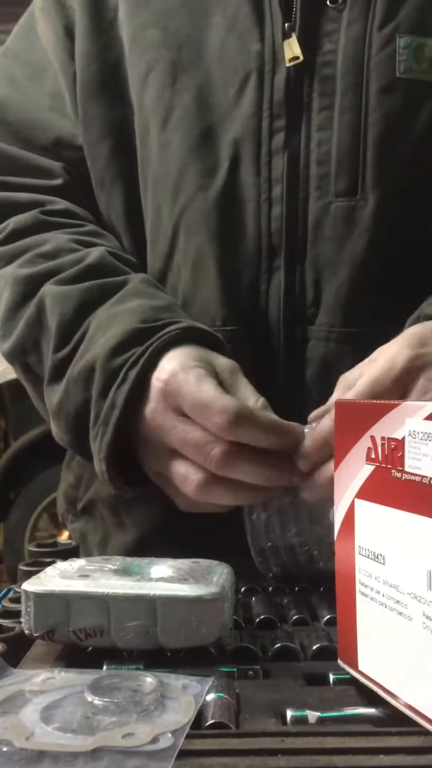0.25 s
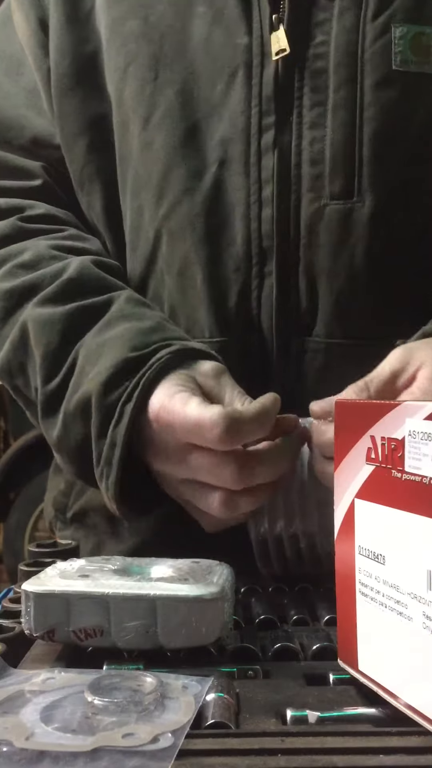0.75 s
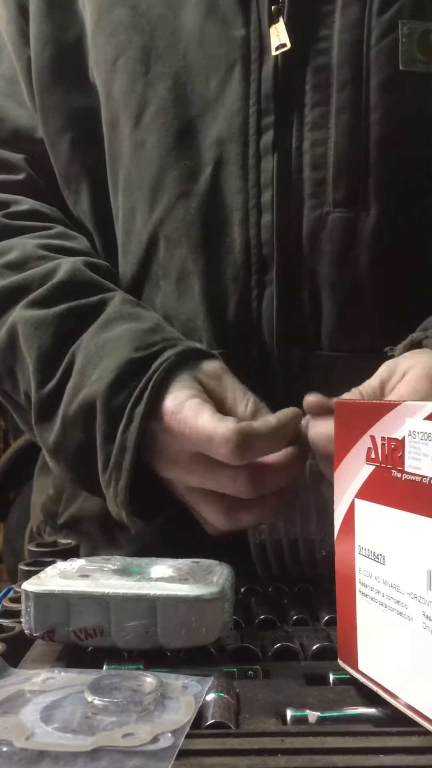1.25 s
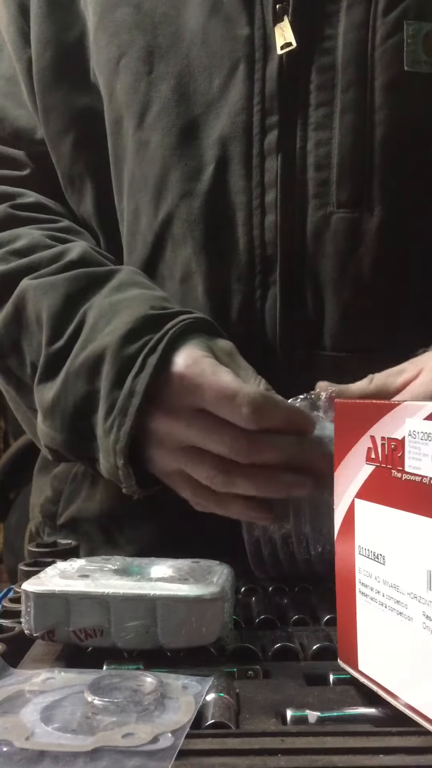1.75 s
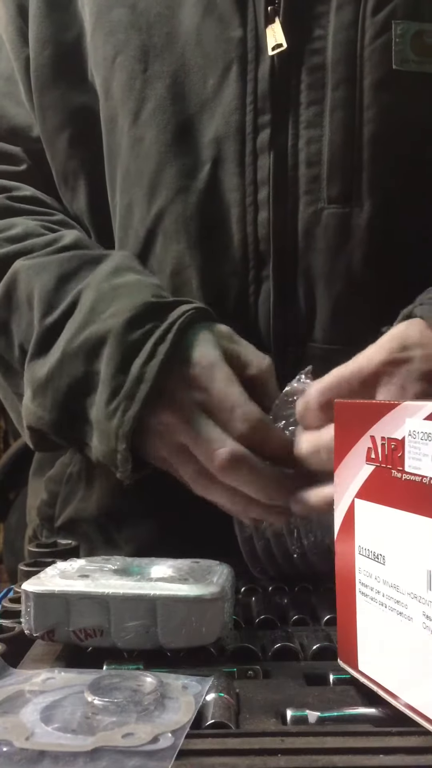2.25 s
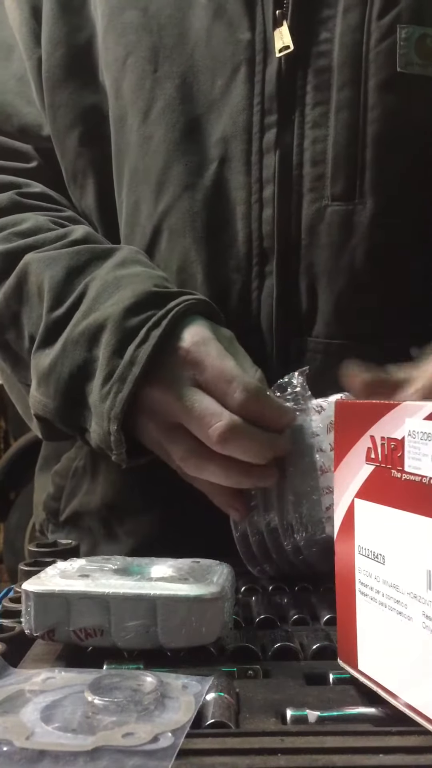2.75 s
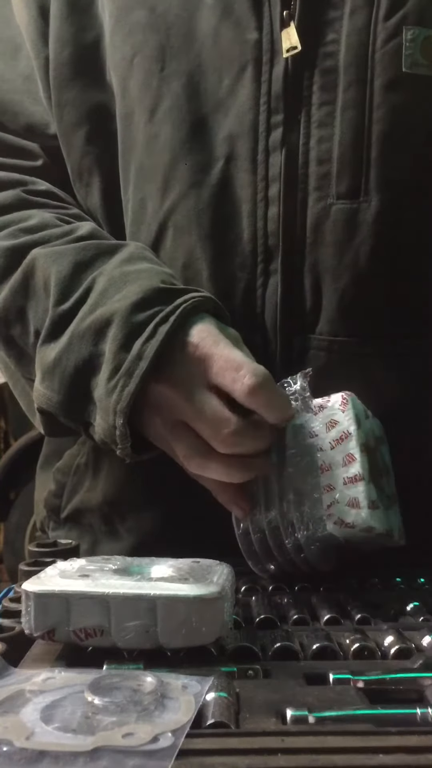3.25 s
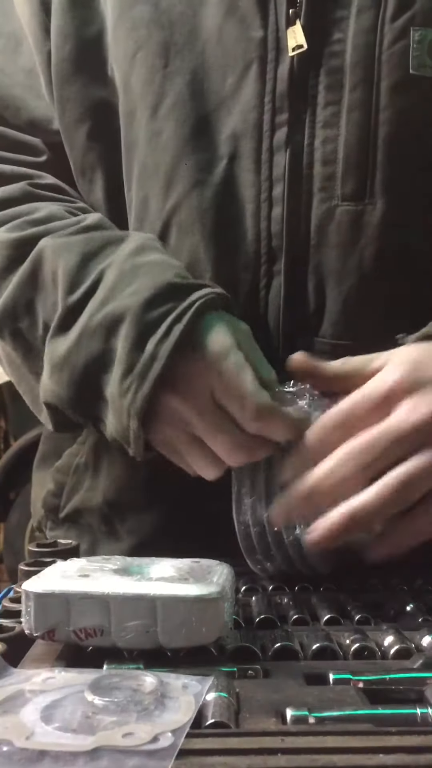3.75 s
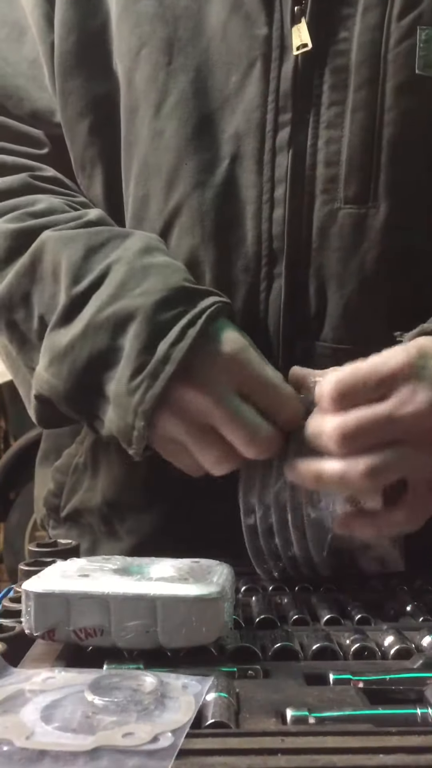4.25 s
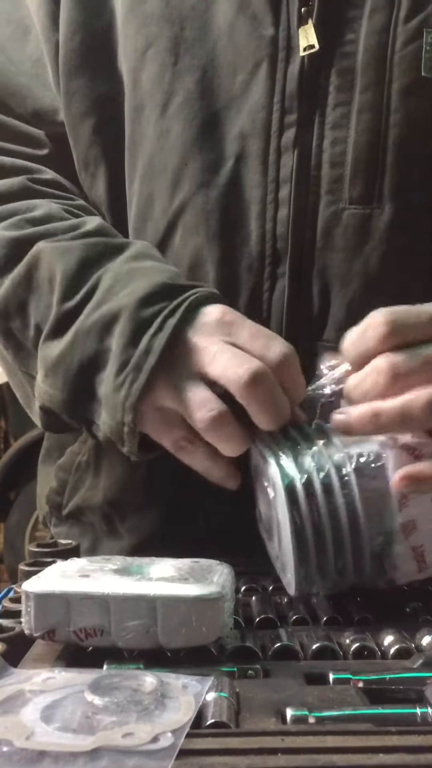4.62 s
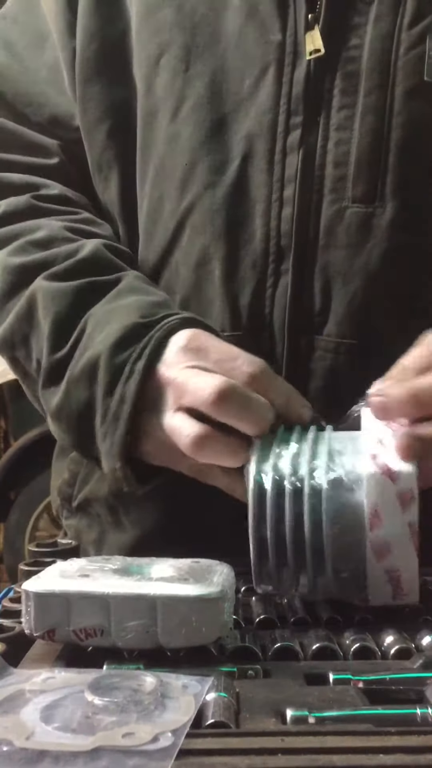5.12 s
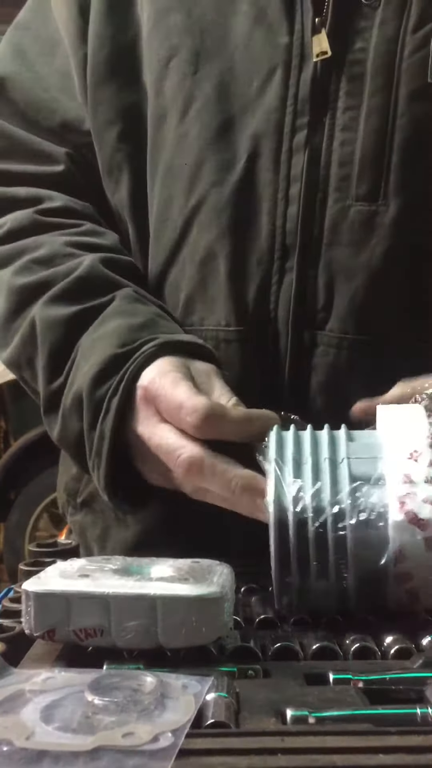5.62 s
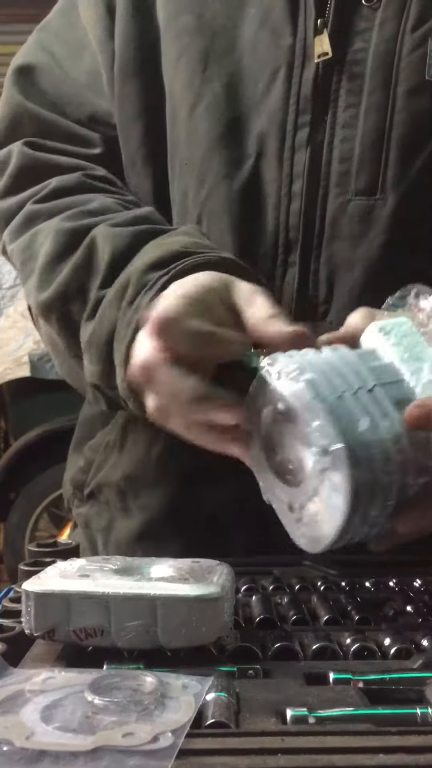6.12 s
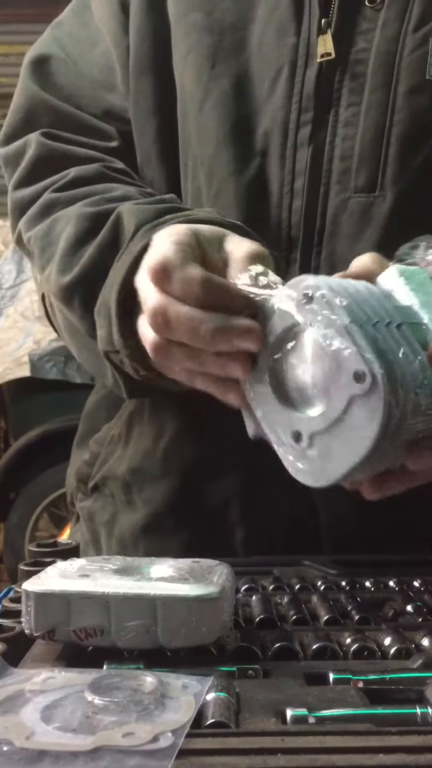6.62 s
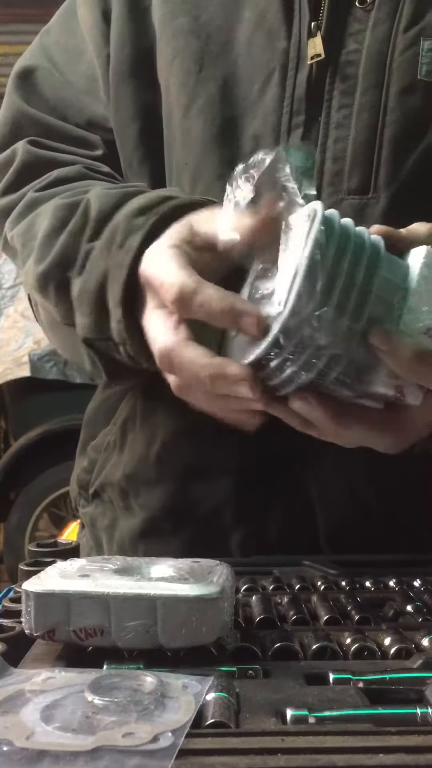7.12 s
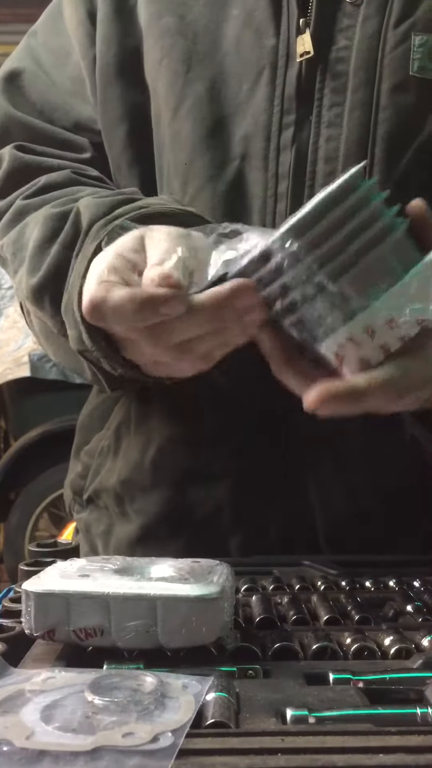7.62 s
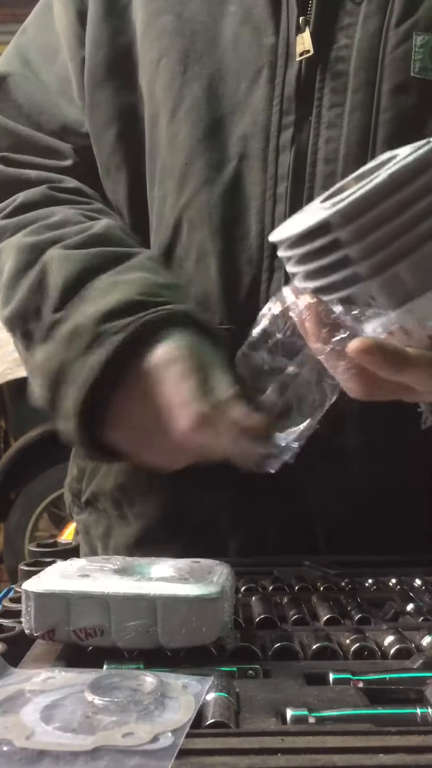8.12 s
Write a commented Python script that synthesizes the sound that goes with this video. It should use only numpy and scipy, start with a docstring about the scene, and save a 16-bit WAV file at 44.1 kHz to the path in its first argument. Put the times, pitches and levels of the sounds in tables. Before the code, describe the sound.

Thin plastic film crackles and rustles in quick snaps as a cardboard box scrapes aside and a metal cylinder knocks dully on a tool tray.

```python
"""Hands pick thin plastic film off a finned metal cylinder in a small workshop, over a faint mains hum and room air.
From the first moment creases flip with snaps, over crinkle and rustle made of tiny clicks and hiss.
Within a second a cardboard box is nudged, and by about three seconds it scrapes and bumps aside: noise bursts and modes.
Then the cylinder knocks on a tray of tools, ringing struck modes, while creaks of slipping film cluster
and a low drone swells and fades; near seven seconds a sleeve swishes as filtered noise, then a tool clinks."""
import sys
import numpy as np
from scipy import signal
from scipy.fft import rfft, irfft, next_fast_len
from scipy.io import wavfile
from scipy.ndimage import map_coordinates

SR = 44100
rng = np.random.default_rng(int(sys.argv[2]) if len(sys.argv) > 2 else 0)


def store_wav(level_fs):
    """Save 16-bit WAV to argv[1]."""
    pcm = np.round(np.clip(np.atleast_2d(level_fs), -1, 1) * 32767)
    wavfile.write(sys.argv[1], SR, pcm.T.astype(np.int16))


N = 369116  # length [samples]

# Levels are before the trims in the functions; spectra and mode sets give relative levels.
# Loudest creases snapping: (time [s], middle level [dB], hollow and bright level against it [dB, dB], ring [Hz])
CREASE_SNAPS = [(0.0603, -21, -13, -46, 2340), (0.1414, -23.5, -31, -25, 4470),
                (0.2257, -27.5, -20, -15.5, 2400), (0.2355, -20, -34, -38, 3600),
                (0.399, -23.5, -34, -19, 3600), (0.42, -24.5, -20, -25, 3540),
                (0.4703, -33.5, -16, -1.5, 8200), (0.51, -30, -17, -9.5, 6540), (0.613, -27, -15, -5, 7200),
                (0.6905, -12.5, -17, -20, 3100), (0.71, -24, -20, -18, 3200), (0.7307, -29.5, -7, -4, 9000),
                (0.742, -31, -8, -7, 5160), (0.756, -26.5, -9, -14, 5440), (0.7824, -26.5, -8.5, -7, 3650),
                (0.836, -23.5, -17, -3, 10400), (0.8455, -27, -30, -21, 1740),
                (0.8574, -21.5, -19, -16, 3220), (0.867, -30, -25, -3.5, 7000), (0.89, -18, -44, -24, 3600),
                (0.902, -25, -23, -16, 2040), (0.973, -11.5, -12, -12, 7450),
                (0.9778, -12, -24, -9.5, 7050), (0.999, -15.5, -22, -12, 3460),
                (1.0255, -21, -13, -9, 3000), (1.038, -15.5, -11, -10.5, 5320),
                (1.0617, -22, -16, -11, 6900), (1.068, -18, -10, -7.5, 6900), (1.0877, -20, -17, -10, 1670),
                (1.1744, -23.5, -22, -17, 4300), (1.0809, -15, -16, -12, 5470),
                (1.1433, -20.5, -9.5, -8.5, 1670), (1.158, -17, -23, -18, 4260),
                (1.2186, -11.5, -23.5, -12, 3900), (1.259, -39, -31, 2.5, 7000),
                (1.27, -25, -41, -11, 3520), (1.357, -16.5, -11, -18.5, 1650),
                (1.447, -27, -20, -7.5, 3670), (1.503, -12, -17.5, -22, 3650),
                (1.526, -21, -11, -10.5, 3680), (1.5729, -27.5, -9, -6.5, 3930),
                (1.6212, -22.5, -8, -2.5, 7730), (1.7667, -30, -28, -9, 3600), (1.799, -27, -34, -17, 4130),
                (1.822, -23, -11, -2.5, 6950), (1.921, -31.5, -14, -6.5, 5600),
                (2.0817, -30.5, -32, -11, 5470), (2.1256, -34.5, -24, 2, 7200),
                (2.2563, -28, -13, -13, 2330), (2.2742, -25.5, -18, -16, 2470),
                (2.433, -27, -5.5, -10.5, 1680), (2.507, -28, -10, -15, 2090),
                (2.5482, -22.5, -27, -4, 8300), (2.563, -39, -20, 2, 8950), (3.213, -23, -7, -33, 1770),
                (3.2335, -19.5, -24, -15, 1660), (3.4504, -17, -10, -27, 4760),
                (3.4615, -16.5, -13, -31, 4450), (3.552, -25.5, -14, -9, 5900),
                (3.748, -28, -19, -11, 2350), (3.2786, -15, -30, -22, 3530), (3.595, -23.5, -25, -15, 2130),
                (3.6162, -24, -12, -19, 3020), (3.7703, -25.5, -13, -10.5, 6760),
                (3.7934, -25.5, -13, -14, 2300), (3.8146, -24, -27, -17, 1750),
                (3.832, -25.5, -11, -16.5, 2060), (3.9559, -25, -17, -33, 3150),
                (4.0127, -29, -9, -15, 3080), (3.877, -22.5, -25, -6.5, 3180),
                (3.9876, -29.5, -4.5, 0, 6930), (4.004, -24, -15, -17, 5400),
                (4.0354, -19.5, -16, -19, 3500), (4.087, -18.5, -10, -10.5, 2030),
                (4.2987, -11, -17, -16, 3000), (4.149, -35, -4.5, -2, 7100),
                (4.2165, -21.5, -24, -18, 2900), (4.284, -18, -28, -15, 2970),
                (4.3316, -17, -14, -13, 2950), (4.3718, -34, -10, -2, 11000),
                (4.391, -22.5, -12, -12, 6300), (4.4424, -30.5, -3, -7, 2970),
                (4.7843, -15.5, -8, -19.5, 3600), (4.835, -25, -12, -12, 1900),
                (5.044, -25.5, -18, -10, 5650), (5.0929, -17.5, -12, -13, 3120),
                (5.212, -3, -12.5, -15, 3260), (5.24, -16, -4.5, -8, 1710), (5.2769, -16.5, 0, -7, 1840),
                (5.2825, -17, -10, -8, 1490), (5.31, -16.5, -6.5, -14, 4400), (5.4308, -30, -4.5, -5, 3840),
                (5.6247, -29, -6, -2.5, 7300), (5.6572, -23.5, -11, -11, 5430),
                (5.681, -19.5, -32, -8.5, 5800), (5.857, -13.5, -30, -23, 3360),
                (6.111, -24.5, -29, -14, 3680), (6.179, -26.5, -40, -16.5, 4000),
                (6.4133, -25, -16.5, -11, 3420), (6.608, -24.5, -24, -12, 3500),
                (6.639, -16.5, -13, -10.5, 6300), (6.6582, -28, -19, -7, 4420),
                (6.6787, -19.5, -27, -22, 3430), (6.8295, -21, -12, -14, 3100),
                (6.8721, -19, -26, -10, 3150), (6.908, -16, -20.5, -20, 4250), (6.92, -27, -6, -9, 2460),
                (7.0265, -38, -17, 0, 9000), (7.172, -37.5, -3, -5, 3700), (7.383, -19.5, -30, -6.5, 3520),
                (7.419, -23.5, -22, -11.5, 3360), (7.5524, -13, -28.5, -27, 3560),
                (7.895, -23.5, -9, -7, 6000), (7.939, -14.5, -33, -16, 3440),
                (8.0049, -10.5, -24.5, -19, 2560), (8.1364, -24.5, -14, -18, 3520),
                (8.261, -26, -11.5, -7.5, 6750)]
# Finger pinches and pulls: (start [s], length [s], crinkle [dB], bright and hollow level against it [dB, dB])
FILM_PULLS = [(0.513, 0.03, -43, -1, 1), (0.684, 0.14, -46.5, -4, 2), (0.982, 0.0034, -41.5, -15, 6),
              (1.036, 0.075, -37, -3.5, -2), (1.13, 0.13, -53, -14, -14), (1.348, 0.092, -45.5, 2, 4.5),
              (1.491, 0.054, -43.5, -16, 5.5), (1.6, 0.02, -42.5, 3, 5.5), (1.76, 0.13, -47.5, -2, -12),
              (2.191, 0.055, -43.5, 1.5, 5.5), (2.321, 0.02, -45, -25, 4.5), (2.431, 0.046, -55, 4, 10),
              (2.531, 0.018, -40.5, -7.5, 1), (2.693, 0.018, -41, 0, 7), (3.28, 0.13, -41.5, -3, -9.5),
              (3.521, 0.072, -46.5, -0.5, 13), (3.846, 0.021, -44, 0, 9.5), (4.0, 0.25, -50.5, 1.5, -3),
              (4.288, 0.027, -37, 4, 1), (4.35, 0.12, -48, -8.5, 7.5), (4.649, 0.11, -49, 4, 10),
              (4.9, 0.074, -49, 4.5, 1), (5.05, 0.04, -39, 2, 6), (5.25, 0.025, -32.5, -5.5, -2),
              (5.42, 0.077, -46.5, 2, 4), (5.54, 0.091, -45, 1.5, 9.5), (5.811, 0.04, -44.5, 0.5, 5.5),
              (5.918, 0.086, -46.5, 1, 4), (6.08, 0.019, -48.5, 7.5, 6), (6.349, 0.062, -49, -24, 0),
              (6.599, 0.0085, -46.5, 5, 2.5), (6.634, 0.064, -40, -0.5, -0.5), (6.75, 0.15, -42.5, 1, 3),
              (7.208, 0.058, -42.5, 1.5, -2.5), (7.381, 0.095, -47, -1, 6.5), (7.68, 0.091, -49.5, 3, -1.5),
              (7.813, 0.062, -38.5, 0.5, -2.5), (7.904, 0.05, -32.5, -0.5, -4),
              (8.102, 0.073, -51.5, 1.5, 7), (8.233, 0.044, -53.5, 11.5, 8)]
# Film stirring while held: (time [s], crinkle level [dB])
FILM_HOLD = [(0, -55), (.6, -56), (1.1, -50), (1.7, -54), (2.2, -51), (2.72, -60), (2.8, -84),
             (2.93, -68.5), (3.7, -55), (4.35, -51), (4.58, -64), (4.85, -52.5), (5.7, -51), (6.3, -55),
             (6.54, -57), (6.9, -50), (7.13, -63), (7.4, -59.5), (7.6, -51.5), (8.36, -62.5)]
# Hollow rustle of the held film: (time [s], level against its crinkle [dB])
HOLLOW_RUSTLE = [(0, 6), (2.5, 4.5), (4.6, 14), (5.3, 9), (6.4, 5), (7.4, 5), (8.3, 1)]
# Film creaking under a fingertip: (time [s], length [s], level [dB], centre pitch [Hz])
FILM_CREAKS = [(1.907, 0.018, -35.5, 1600), (3.451, 0.014, -26, 1330), (3.478, 0.006, -31.5, 1260),
               (3.531, 0.042, -41.5, 1300), (4.757, .008, -39, 1400), (4.921, .005, -41, 1160),
               (5.072, 0.008, -31.5, 960), (5.16, 0.011, -42.5, 1090), (5.472, 0.0064, -30, 1290),
               (5.586, .018, -39, 1160), (7.591, 0.0051, -45.5, 1420), (8.155, 0.0051, -42.5, 1220)]
# Hollow, middle and bright ranges of the sheet: (frequency [Hz], density [dB per Hz])
FILM_LOW_SPECTRUM = [(100, -17.5), (260, -4.5), (400, -3), (540, -18), (760, -4.5), (960, 8), (1170, 4),
                     (1400, 3.5), (1750, -16), (2400, -11.5), (5000, -99)]
FILM_MID_SPECTRUM = [(600, -31), (1500, -13), (1950, -1.5), (2450, 6), (2900, 4.5), (3460, 8.5), (3850, 5),
                     (4250, 6), (5700, 0), (7000, -12), (12000, -73)]
FILM_TOP_SPECTRUM = [(2500, -58), (5200, -4.5), (6300, -0.5), (7200, -1), (8800, 1), (10300, -5),
                     (11200, -4), (15500, -7.5)]
# Colour of film heard from beside the box: (frequency [Hz], density [dB per Hz])
BESIDE_BOX_SPECTRUM = [(350, -2), (560, 17.5), (950, -8.5), (1400, 4), (1660, 12.5), (1760, 19),
                       (1950, 5.5), (3400, 1), (5000, 2.5), (7100, 8), (8200, -1), (15000, 4)]
# Film sound that comes from beside the box: (time [s], share [0 to 1])
BESIDE_BOX_SHARE = [(2.8, 0.8), (3.2, 0.32)]
# Cooling fins of the cylinder: (frequency [Hz], level [dB], t60 [s])
FIN_MODES = [(963, -12, 0.1), (1282, 6.5, 0.094), (1370, 5, 0.19), (1445, 7, 0.34), (3520, 1.5, 0.042)]
# How readily the fins ring as the wrap comes off: (time [s], level [dB])
FIN_FREEDOM = [(2.5, -22), (4.3, -16), (6.0, -11), (7.4, -15), (8.3, -7)]
# Dull bump of the cardboard box (first row), then the cylinder meeting the tool tray:
# (time [s], thud level [dB], clank level [dB])
DULL_KNOCKS = [(.329, -29, -29), (3.455, -51, -27.5), (3.461, -31, -32.5), (3.48, -33, -29.5),
               (3.53, -28, -43), (4.329, -41, -30.5), (4.345, -29.5, -28), (4.361, -28.5, -28),
               (4.711, -27.5, -22), (4.732, -28, -27.5), (4.951, -24, -20), (4.974, -27.5, -32),
               (5.497, -26, -25.5), (5.857, -23.5, -25), (7.353, -48, -39.5)]
# Tray under the cylinder, dull and bright modes: (frequency [Hz], level [dB], t60 [s])
TRAY_THUD_MODES = [(157, -6.5, 0.098), (213.5, -3, 0.13), (266.5, 2, 0.098), (310, -8, 0.18)]
TRAY_CLANK_MODES = [(1069, 8.5, 0.017), (1265, 1.5, 0.029), (1820, 7, 0.0093), (2650, -17, 0.014),
                    (3190, 2, 0.018)]
# Bench boom: (frequency [Hz], level [dB], t60 [s])
BENCH_MODES = [(66.4, 1, 0.098), (101, 1.5, 0.19)]
# Noise in the knocks: (frequency [Hz], density [dB per Hz])
THUD_SPECTRUM = [(45, -23), (70, -1.5), (110, -6), (160, -7.5), (260, -6), (370, -10.5), (470, -9),
                 (700, -20.5), (2000, -116)]
CLANK_SPECTRUM = [(300, -8), (600, -3.5), (1050, 7), (1450, 1.5), (2200, -1.5), (3200, -6.5), (5000, -13.5),
                  (15000, -34)]
# Tools clinking: (time [s], level [dB], t60 of the extra damping by whatever they lie on [s])
TOOL_CLINKS = [(3.461, -39, 0.46), (7.353, -23.5, 0.036)]
# Steel tool before that damping: (frequency [Hz], level [dB], t60 [s])
STEEL_MODES = [(5400, -11, 0.062), (8600, -20, 0.035), (11400, -4, 0.062), (14200, -12, .15)]
# Bumps of the cardboard box: (time [s], thud level [dB], slap level [dB])
BOX_BUMPS = [(0.934, -34, -43), (1.081, -41.5, -33), (1.503, -38, -37), (2.216, -43, -35.5),
             (2.944, -32, -35), (3.066, -41, -41), (3.136, -39, -33.5), (3.201, -24.5, -27),
             (3.232, -27.5, -18.5), (3.264, -28, -29), (3.341, -23, -31), (3.35, -18, -19),
             (3.513, -23.5, -29.5), (3.971, -34.5, -37)]
# Hand brushing the box, then sliding it in jerks: (start [s], length [s], hollow scrape [dB], surface hiss [dB])
BOX_SLIDE = [(1.365, 0.078, -48, -62), (2.327, .04, -50.5, -67), (2.972, .03, -52, -56),
             (2.996, 0.074, -43, -49), (3.106, 0.024, -42.5, -41.5), (3.181, 0.056, -42.5, -37),
             (3.283, 0.039, -34, -40), (3.364, 0.095, -42, -46.5), (3.473, 0.11, -50, -62)]
# Hollow box panels: (frequency [Hz], level [dB], t60 [s])
BOX_PANEL_MODES = [(452, -6.5, 0.045), (619, 2.5, 0.057), (806, -1, 0.022), (940, 5.5, 0.036),
                   (1240, -8, 0.088), (1800, -25, 0.06)]
# Box thud, cardboard slap and scrape, and surface hiss: (frequency [Hz], density [dB per Hz])
BOX_THUD_SPECTRUM = [(50, -30), (80, -6), (120, -11), (170, -5), (250, -2), (370, -4.5), (470, -17.5),
                     (700, -23), (2000, -68)]
CARDBOARD_SPECTRUM = [(150, -16), (450, -8.5), (620, 3), (780, -3), (950, -2.5), (1400, 2.5), (2100, -8),
                      (4000, -22), (15000, -35)]
SURFACE_SPECTRUM = [(900, -36), (1800, 3.5), (2700, 4), (3500, 7), (5000, -7), (7000, -8), (15500, -17)]
# Hands and jacket shifting on the load: (start [s], length [s], level [dB])
JACKET_RUBS = [(0, 0.011, -37), (0.11, 0.44, -54), (0.67, 0.07, -47), (1.38, 0.17, -47), (1.55, 0.031, -54),
               (2.38, 0.19, -55.5), (3.104, 0.22, -51), (3.4, 0.22, -41.5), (3.71, 0.34, -50.5),
               (4.45, 0.68, -53.5), (5.17, 0.84, -54.5), (7.844, 0.18, -50.5)]
# Sleeve as the hand jerks away: (time [s], level [dB])
SLEEVE_SWISH = [(6.975, -73), (7.0, -33.5), (7.05, -39), (7.11, -48.5), (7.24, -59.5)]
# Heavy rubbing and sleeve cloth: (frequency [Hz], density [dB per Hz])
RUB_SPECTRUM = [(35, -18), (70, 7), (110, 7.5), (175, 4), (250, 4), (350, -0.5), (500, -10), (700, -12.5),
                (1200, -19), (4000, -55)]
CLOTH_SPECTRUM = [(150, -9), (290, -1.5), (430, 0), (580, -6.5), (830, 1.5), (1100, -4.5), (1400, -6),
                  (2500, -15.5), (5000, -28), (15000, -37)]
# Decay of the room: (frequency [Hz], t60 [s])
ROOM_DECAY = [(100, 0.46), (1000, 0.042), (5000, 0.056), (15000, 0.058)]
# Room air: (frequency [Hz], density [dB per Hz])
AIR_SPECTRUM = [(30, -24), (45, 7), (68, 6.5), (95, 0.5), (130, 7.5), (180, -5), (340, -7.5), (550, -32),
                (1050, -20.5), (2200, -10.5), (4000, -24.5), (16000, -38)]
# Mains hum: (frequency [Hz], rms level [dB])
MAINS_HUM = [(120, -55), (240, -74)]
# Faint low drone: (time [s], rms level [dB])
DRONE_SWELL = [(3.3, -68), (4.0, -49.5), (5.8, -56), (6.6, -66)]

TOP_HZ = 15850  # upper band limit
LEAD_S = .003  # strain before a crease cracks
CRACK_DELAY_S = .0008  # from the onset of a snap to its full crack
ATTACK_S, RELEASE_DB_PER_S = 0.024, 420  # a movement takes hold quickly and dies away once the fingers stop
RUB_ATTACK_S, RUB_RELEASE_DB_PER_S = 0.045, 191  # heavy cloth starts and settles more slowly
HOLD_BRIGHT_DB = -0.5  # bright level of the held film against its crinkle
DRONE_HZ = 70.8


def film(low, mid, top):
    """The sheet radiates in three broad ranges, partly coloured by the gap beside the box, less once it is moved."""
    sound = colour(low, FILM_LOW_SPECTRUM) + colour(mid, FILM_MID_SPECTRUM) + colour(top, FILM_TOP_SPECTRUM)
    beside = np.clip(curves(BESIDE_BOX_SHARE)[0], 0, 1)
    return (1 - beside) * sound + colour(beside * sound, BESIDE_BOX_SPECTRUM)


def snaps(low_db=-10, mid_db=-22, top_db=-9, crack_s=0.0014, flutter_db=-15):
    """The loud creases flip one by one, each with its own depth, brightness and ring."""
    low, mid, top = np.zeros((3, N))
    for s, db, depth_db, bright_db, ring_hz in CREASE_SNAPS:
        click = buckle(ring_hz, crack_s=crack_s, flutter_db=flutter_db)
        start = s + CRACK_DELAY_S - LEAD_S
        add(low, start, amp(db + depth_db + low_db) * at_strength(click, FILM_LOW_SPECTRUM))
        add(mid, start, amp(db + mid_db) * at_strength(click, FILM_MID_SPECTRUM))
        add(top, start, amp(db + bright_db + top_db) * at_strength(click, FILM_TOP_SPECTRUM))
    return np.array([low, mid, top])


def buckle(ring_hz, lead_in_db=-14, crack_s=0.0031, flutter_db=-16, facet_db=-5, cycles=7):
    """One crease flips: it strains briefly, cracks, flutters the sheet, and the freed facet rings at two pitches."""
    t = np.arange(SR // 25) / SR - LEAD_S
    age = np.maximum(t, 0)
    flutter = amp(flutter_db) * np.exp(-age / .007)
    strain = amp(lead_in_db) * (1 + t / LEAD_S)
    shape = np.where(t < 0, strain, np.exp(-age / crack_s) + flutter)
    hz = np.minimum(ring_hz * np.array([[1], [rng.uniform(2.0, 3.66)]]), TOP_HZ)
    pitches = np.sin(2 * np.pi * hz * age) * np.exp(-age * hz / cycles)
    facet = [1, .5] @ pitches
    crack = shape * rng.standard_normal(len(t))
    return unit(crack + amp(facet_db) * np.sqrt(ring_hz / 4000) * facet)


def at_strength(click, spectrum):
    """A click scaled to give a set energy within one range of the sheet."""
    weight = unit(amp(along(spectrum, np.fft.rfftfreq(len(click), 1 / SR))))
    return click / np.sqrt(np.mean(np.abs(rfft(click) * weight) ** 2) / len(click))


def crinkle(crinkle_db=-2, top_db=-2, hollow_db=-3.5, slip=0.34, hollow_slip=0.67, catch_db=10.5, slip_growth=0.64):
    """Worked film: held lightly it only ticks; harder work flips more creases, and layers hiss as they catch and slip."""
    low, mid, top = work()
    effort = unit(mid ** .4)
    swarm = crackle(520 * effort, spread_db=6.5) / np.sqrt(effort)
    catching = amp(catch_db * np.tanh(wobble(130)))
    hiss = unit(rng.standard_normal(N) * catching) * effort ** slip_growth
    hollow = swarm + hollow_slip * hiss
    crisp = swarm + slip * hiss
    return np.array([hollow * low * amp(hollow_db), crisp * mid * amp(crinkle_db), crisp * top * amp(top_db)])


def work():
    """Strength of the film's hollow, middle and bright range: powers of steady holding and every pull add up."""
    hold_db, = curves(FILM_HOLD)
    power = amp([hold_db + curves(HOLLOW_RUSTLE)[0], hold_db, hold_db + HOLD_BRIGHT_DB]) ** 2
    for s, length, db, bright_db, hollow_db in FILM_PULLS:
        pull = gesture(s, length, ATTACK_S, RELEASE_DB_PER_S)
        power += np.outer(amp([db + hollow_db, db, db + bright_db]), pull) ** 2
    return np.sqrt(power)


def crackle(rate, spread_db, cap=2.73, focus_db=6, count=300):
    """Swarm of rms 1 of tiny buckles, rate a second: many weak, a few strong, each loudest near its own pitch."""
    clicks, swarm = [], np.zeros(N)
    for ring_hz in np.geomspace(1500, 14000, count):
        click = buckle(ring_hz)
        octaves_off = np.abs(np.log2((np.fft.rfftfreq(len(click), 1 / SR) + 1) / ring_hz))
        focus = amp(-focus_db * np.minimum(octaves_off, 2))
        focused = irfft(rfft(click) * focus, len(click))
        clicks.append(np.sqrt(ring_hz) * unit(focused))
    sizes = amp(spread_db * np.minimum(rng.standard_exponential(N), cap))
    crease = rng.integers(count, size=N)
    for i in np.flatnonzero(rng.random(N) < rate / SR):
        add(swarm, i / SR, sizes[i] * clicks[crease[i]])
    return unit(swarm)


def creaks(slips_per_s=420, slip_t60=0.014, pitch_spread=0.12, release_db_per_s=900):
    """Film sticks and slips over the metal: each slip rings the taut patch at a slightly different pitch."""
    track, t = np.zeros(N), np.arange(SR // 50) / SR
    for s, length, db, hz in FILM_CREAKS:
        run = np.zeros(SR // 8)
        for k, (late, size, shift) in enumerate(rng.uniform(-1, 1, (64, 3))):
            slip = np.sin(2 * np.pi * hz * (1 + pitch_spread * shift) * t) * amp(-60 * t / slip_t60)
            add(run, (k + late / 2) / slips_per_s, (1 + size / 2) * slip)
        after = np.maximum(np.arange(len(run)) / SR - length, 0)
        add(track, s, unit(run) * amp(db - release_db_per_s * after))
    return track


def fins(rustle, fin_db=-1):
    """Film dragged over the cylinder keeps its fins ringing faintly."""
    t = np.arange(SR // 4) / SR
    modes = sum(amp(db - 60 * t / t60) / np.sqrt(t60) * np.sin(2 * np.pi * hz * t) for hz, db, t60 in FIN_MODES)
    drive = rustle * amp(curves(FIN_FREEDOM)[0] + fin_db)
    return signal.fftconvolve(drive, modes / np.linalg.norm(modes))[:N]


def knocks(thud_ring_db=-1, thud_noise_db=-6, clank_ring_db=-4, clank_noise_db=-1.0, bench_db=-9,
           swell_s=0.0041, fin_ring_db=-6):
    """A first box bump, then cylinder contacts, all through tray, fin and swelling bench modes; twice a tool clinks."""
    tones, thud, clank = np.zeros((3, N))
    t = np.arange(SR // 2) / SR
    for s, thud_db, clank_db in DULL_KNOCKS:
        add(tones, s, amp(thud_db + thud_ring_db) * ring(TRAY_THUD_MODES, detune=0.048))
        add(tones, s, amp(clank_db + clank_ring_db) * ring(TRAY_CLANK_MODES, detune=0.022))
        contact_db = np.interp(s, *np.transpose(FIN_FREEDOM))
        fin_ring = gripped(ring(FIN_MODES, scatter_db=4, detune=0.004))
        add(tones, s, amp(clank_db + contact_db + fin_ring_db) * fin_ring)
        boom = ring(BENCH_MODES, detune=0.058) * (1 - np.exp(-t / swell_s))
        add(tones, s, amp(thud_db + bench_db) * boom)
        add(thud, s, amp(thud_db + thud_noise_db) * burst(t60=0.22))
        add(clank, s, amp(clank_db + clank_noise_db) * burst(t60=0.093))
    for s, db, t60 in TOOL_CLINKS:
        add(tones, s, amp(db - 60 * t / t60) * ring(STEEL_MODES))
    return tones + colour(thud, THUD_SPECTRUM) + colour(clank, CLANK_SPECTRUM)


def gripped(ringing, waver_db=3):
    """Fingers and loose film touch the ringing metal, so its level wavers."""
    return ringing * amp(waver_db * np.tanh(wobble(80)[:len(ringing)]))


def box(thud_t60=0.096, slap_t60=0.035, judder_db=3.0, panel_db=-2, slap_noise_db=-2, grip_db=3.5):
    """Cardboard gives dead bumps with a brief hollow ring, and a juddering scrape under a grainy hiss."""
    thud, slap, panels, drag, rasp = np.zeros((5, N))
    for s, thud_db, slap_db in BOX_BUMPS:
        add(thud, s, amp(thud_db) * burst(thud_t60))
        add(slap, s, amp(slap_db + slap_noise_db) * burst(slap_t60))
        add(panels, s, amp(slap_db + panel_db) * ring(BOX_PANEL_MODES))
    for s, length, scrape_db, hiss_db in BOX_SLIDE:
        jerk = gesture(s, length, ATTACK_S, RELEASE_DB_PER_S)
        drag = np.maximum(drag, amp(scrape_db) * jerk)
        rasp = np.maximum(rasp, amp(hiss_db) * jerk)
    scrape = drag * amp(judder_db * wobble(120)) * rng.standard_normal(N)
    fibres = unit(crackle(rate=780, spread_db=7.0) + 0.89 * rng.standard_normal(N))  # the card catches in tiny slips
    hiss = rasp * amp(grip_db * np.tanh(wobble(70))) * colour(fibres, SURFACE_SPECTRUM)
    return panels + hiss + colour(thud, BOX_THUD_SPECTRUM) + colour(slap + scrape, CARDBOARD_SPECTRUM)


def jacket(rub_db=0, uneven_db=4):
    """Dull uneven rubbing of hands and heavy cloth, and one swish of the sleeve."""
    shifting = sum(amp(db) * gesture(s, length, RUB_ATTACK_S, RUB_RELEASE_DB_PER_S) for s, length, db in JACKET_RUBS)
    rub = shifting * amp(rub_db + uneven_db * np.tanh(wobble(40))) * noise(RUB_SPECTRUM)
    swish = amp(curves(SLEEVE_SWISH)[0]) * noise(CLOTH_SPECTRUM)
    return rub + swish


def workshop(x):
    """The short answer of the room, a noise tail with its own decay at each frequency."""
    hz, t, z = signal.stft(rng.standard_normal(SR // 3), SR, nperseg=256)
    decay = amp(-60 * t / along(ROOM_DECAY, hz)[:, None])
    tail = signal.istft(z * decay, SR, nperseg=256)[1]
    delayed = np.pad(x, (SR // 250, 0))  # 4 ms
    return signal.fftconvolve(delayed, tail / np.linalg.norm(tail))[:N]


def background(air_db=-55):
    """Room air with a low rumble, a steady mains hum and a passing drone of wandering phase."""
    t = np.arange(N) / SR
    hum = sum(amp(db) * np.sin(2 * np.pi * hz * t) for hz, db in MAINS_HUM)
    drone = amp(curves(DRONE_SWELL)[0]) * np.sin(2 * np.pi * DRONE_HZ * t + 0.47 * wobble(3.1))
    return np.sqrt(2) * (hum + drone) + amp(air_db) * noise(AIR_SPECTRUM)  # sqrt(2): sine peak from rms


def gesture(start, length, attack_s, release_db_per_s):
    """Gain of one movement: a rise that is complete at its start, a hold, a release."""
    t = np.arange(N) / SR - start
    return np.clip(1 + t / attack_s, 0, 1) * amp(-np.clip(release_db_per_s * (t - length), 0, 150))


def ring(modes, scatter_db=3, detune=0.009):
    """Modes struck together; the grip and the point of contact shift their strength and pitch each time."""
    t = np.arange(SR // 2) / SR
    hz, db, t60 = np.transpose(modes)[:, :, None]
    size, shift, phase = rng.standard_normal((3, len(modes), 1))
    level = amp(db + scatter_db * np.tanh(size) - 60 * t / t60)
    partials = level * np.sin(2 * np.pi * (hz * (1 + detune * shift) * t + phase))
    return partials.sum(0) * (1 - np.exp(-t / 0.00035))  # softened onset


def burst(t60):
    """Noise that starts at rms 1 and dies away."""
    t = np.arange(SR // 2) / SR
    return rng.standard_normal(len(t)) * amp(-60 * t / t60)


def noise(spectrum):
    """Coloured noise of rms 1."""
    return colour(rng.standard_normal(N), spectrum)


def colour(x, spectrum):
    """Causal filter of the given shape that keeps the power of white noise."""
    m = 2 * next_fast_len(N // 2 + SR // 4)
    shape = unit(amp(along(spectrum, np.fft.rfftfreq(m, 1 / SR))))
    cepstrum = irfft(np.log(shape))
    cepstrum[1:m // 2] *= 2  # folding the cepstrum gives minimum phase
    cepstrum[m // 2 + 1:] = 0
    return irfft(rfft(x, m) * np.exp(rfft(cepstrum)), m)[:N]


def wobble(rate):
    """A smooth random curve, rate knots a second."""
    knots = rng.standard_normal(int(N * rate / SR) + 4)
    return map_coordinates(knots, [np.arange(N) * rate / SR])


def curves(rows):
    """One value per sample for each column after the time."""
    s, *cols = np.transpose(rows)
    return [np.interp(np.arange(N) / SR, s, c) for c in cols]


def along(points, hz):
    """(frequency [Hz], value) points read on a log frequency axis."""
    f, v = np.transpose(points)
    return np.interp(np.log(hz + 1), np.log(f + 1), v)


def add(track, s, sound):
    """Mix a sound into a track at time s."""
    part = track[max(round(s * SR), 0):][:len(sound)]
    part += sound[:len(part)]


def unit(x):
    """Scaled to rms 1."""
    return x / np.sqrt(np.mean(x ** 2) + 1e-20)


def amp(db):
    """Decibels to gain."""
    return 10 ** (np.asarray(db) / 20)


def scene(room_db=-12):
    """All handling sounds with the room's answer, over the background."""
    worked = crinkle()
    sheet = film(*(snaps() + worked))
    near = sheet + fins(worked[0]) + creaks() + knocks() + box() + jacket()
    return (near + amp(room_db) * workshop(near) + background())[None]


def record(dry, low_cut_hz=45):
    """A high-pass sheds the deepest bass, and nothing is kept above the band limit."""
    thin = signal.sosfilt(signal.butter(3, low_cut_hz, "highpass", fs=SR, output="sos"), dry)
    m = next_fast_len(N + SR // 2)
    return irfft(rfft(thin, m) * (np.fft.rfftfreq(m, 1 / SR) < TOP_HZ), m)[..., :N]


dry = scene()
out = record(dry)
store_wav(out)
```